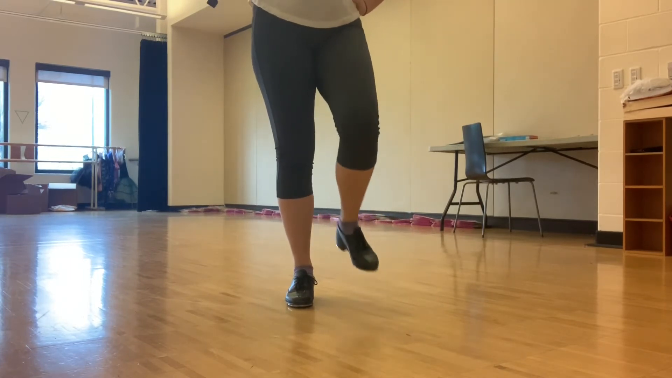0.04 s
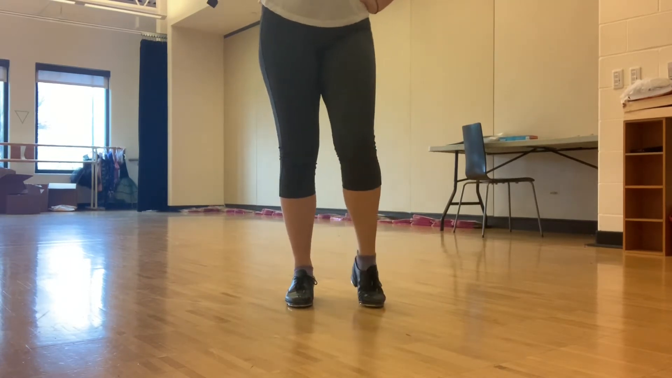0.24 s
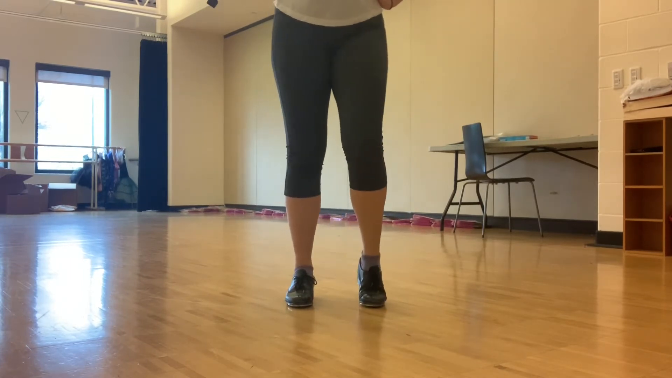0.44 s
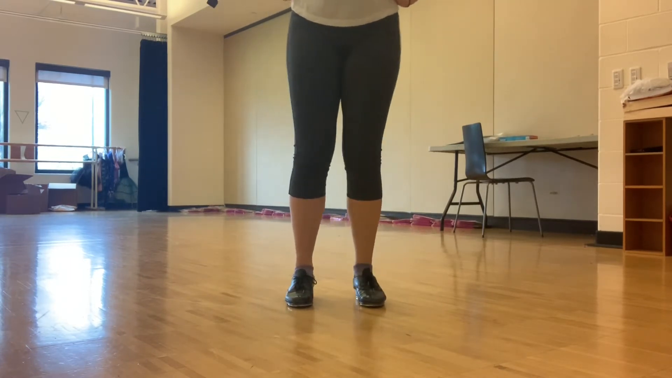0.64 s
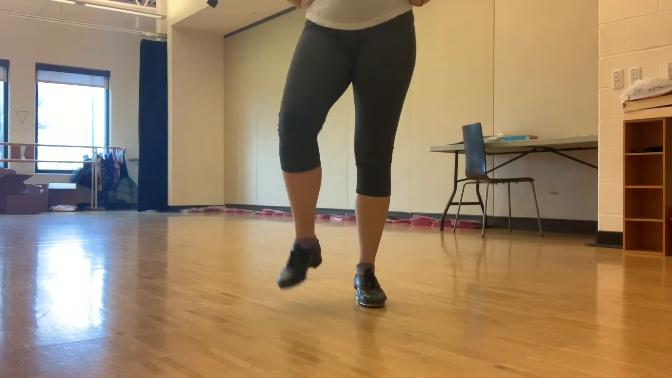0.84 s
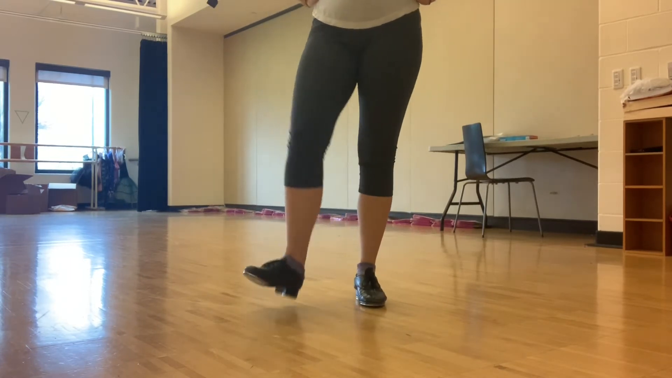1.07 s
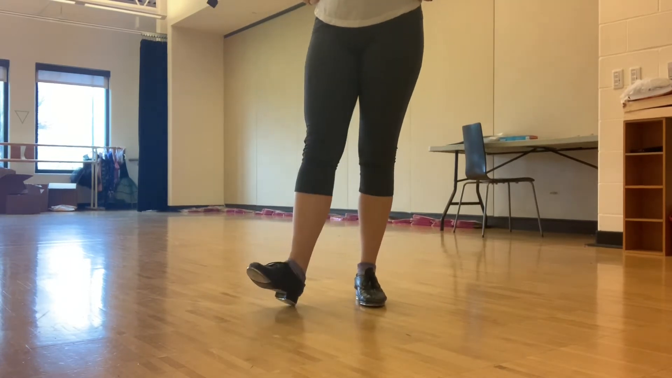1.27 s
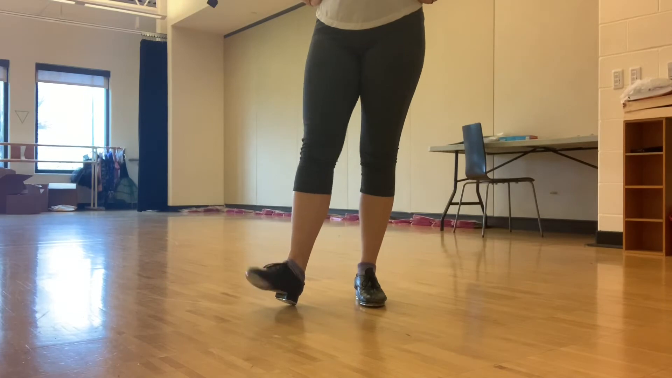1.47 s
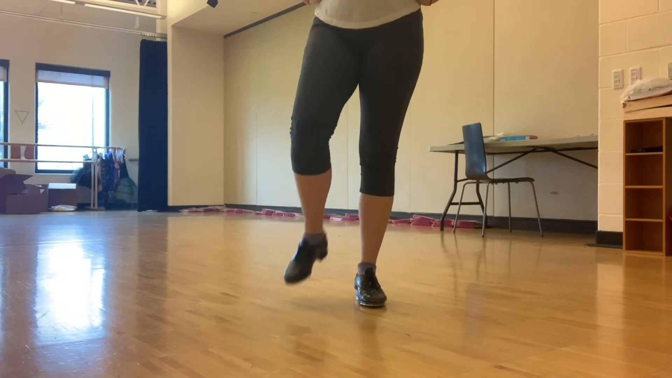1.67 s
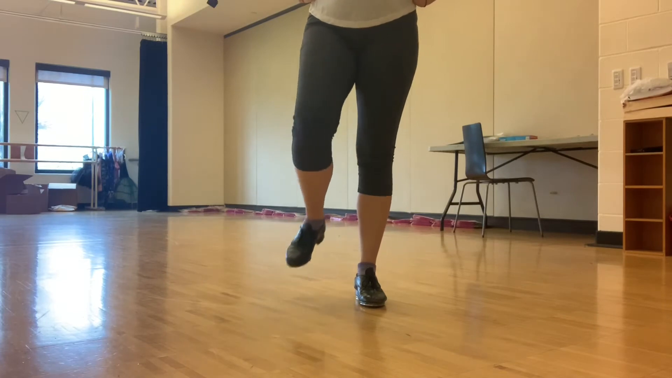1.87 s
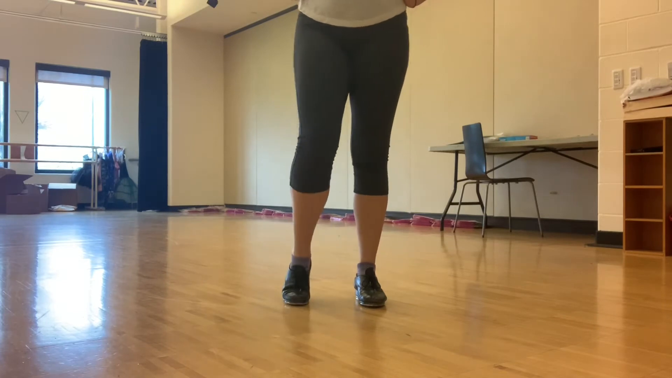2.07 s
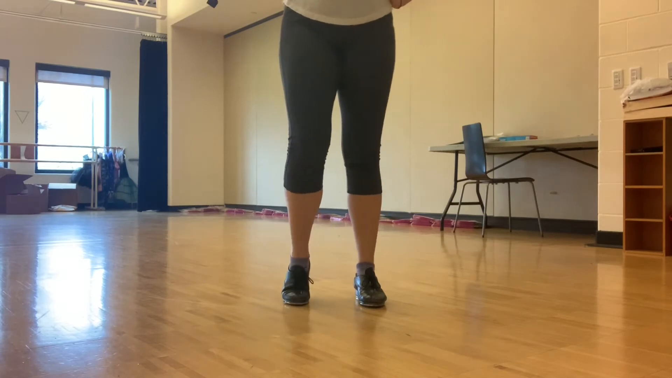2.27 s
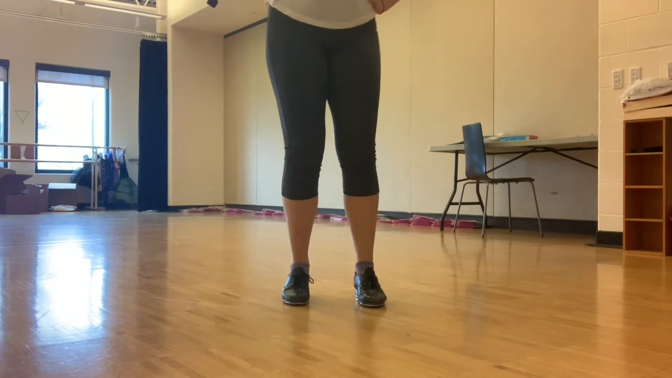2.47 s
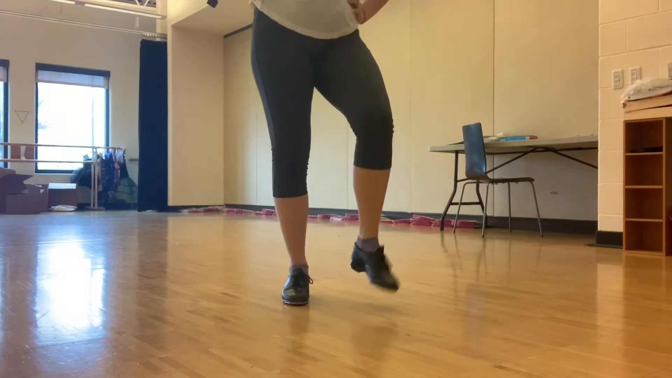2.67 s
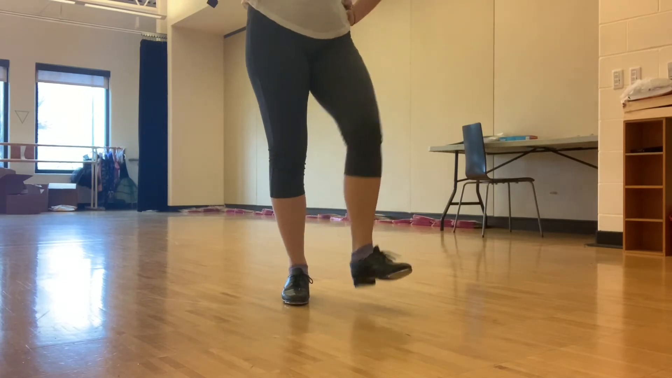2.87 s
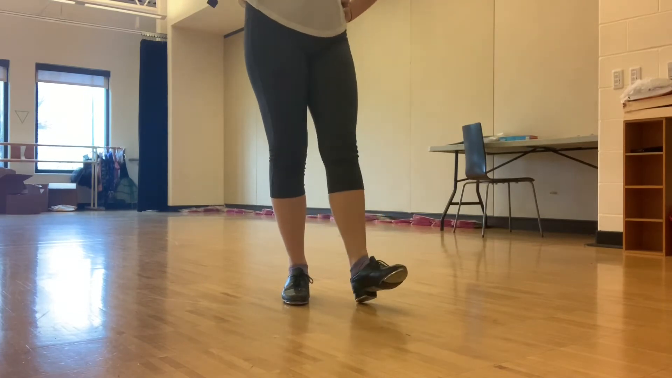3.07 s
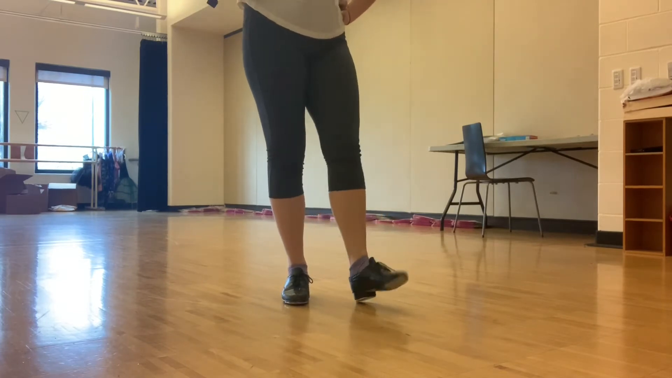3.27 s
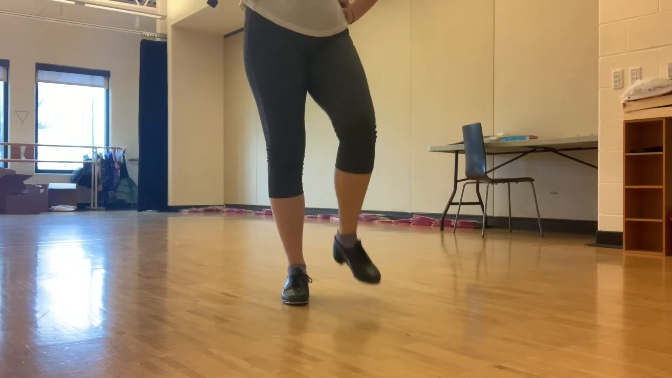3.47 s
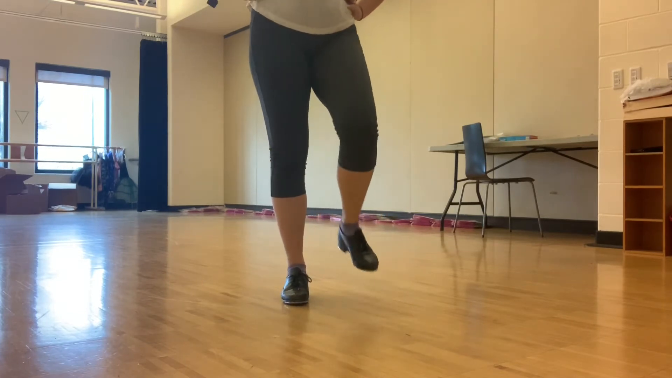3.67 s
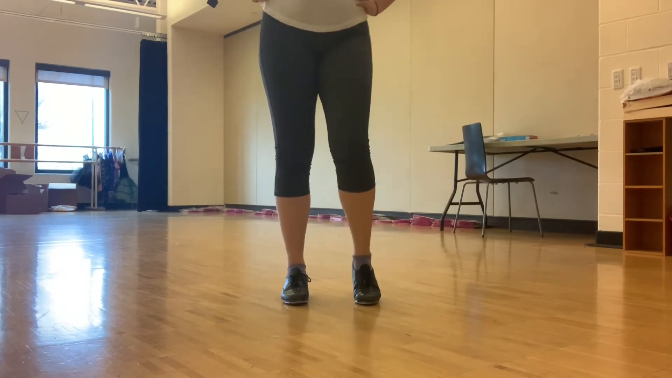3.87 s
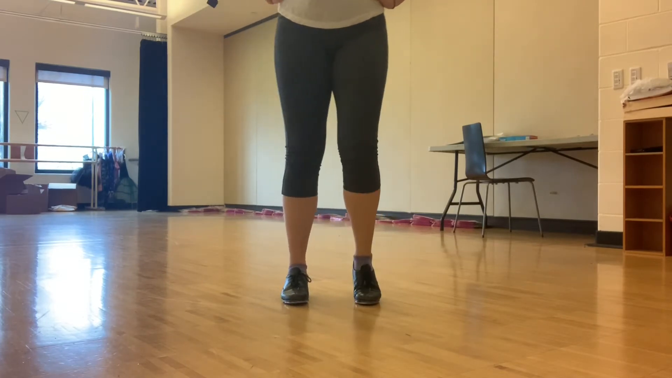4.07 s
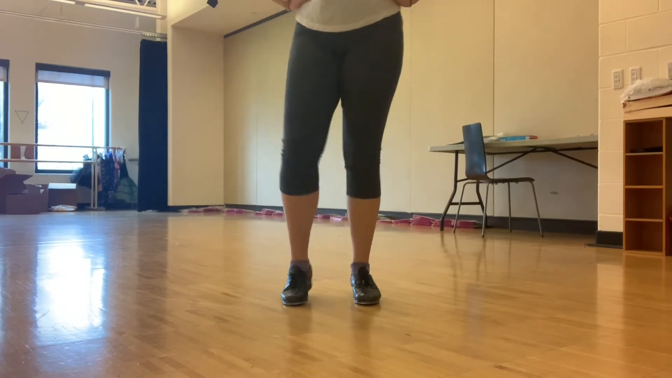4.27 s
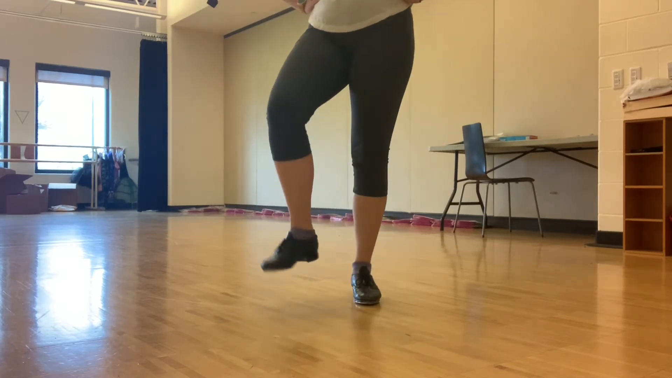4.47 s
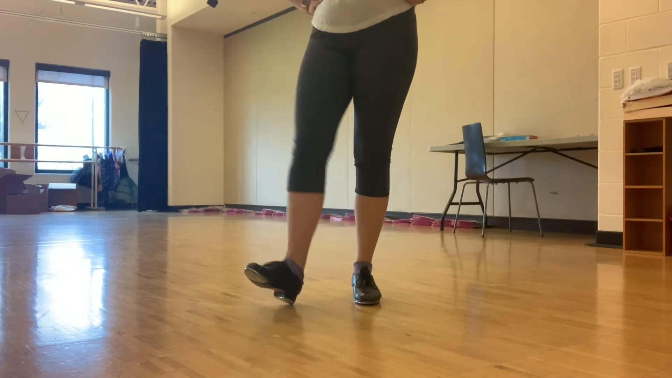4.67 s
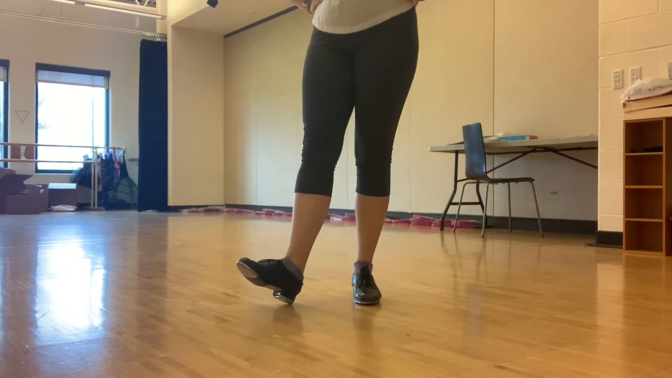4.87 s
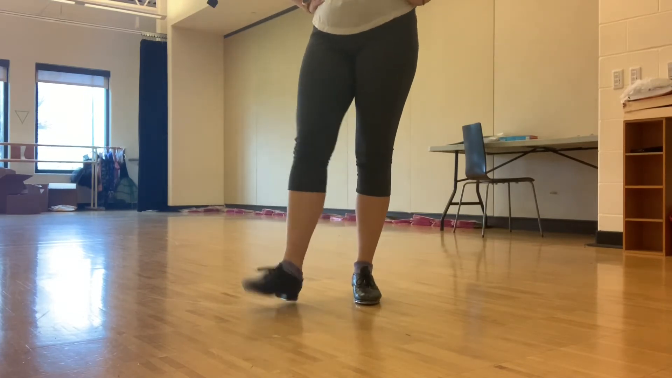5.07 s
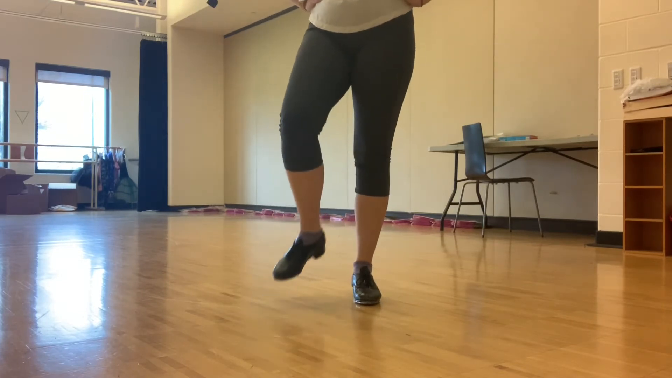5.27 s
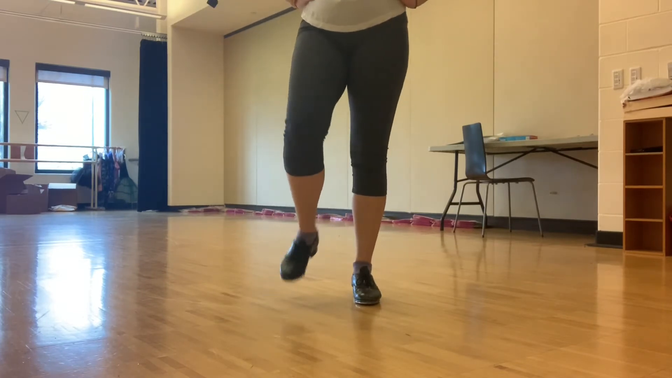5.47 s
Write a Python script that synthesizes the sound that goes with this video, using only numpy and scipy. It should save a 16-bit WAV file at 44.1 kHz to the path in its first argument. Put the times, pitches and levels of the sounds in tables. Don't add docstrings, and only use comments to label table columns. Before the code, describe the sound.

Tap shoes strike a wooden studio floor in slow, evenly spaced single taps, with ringing echoes and low ventilation rumble underneath.

```python
import sys
import numpy as np
from scipy import signal
from scipy.fft import rfft, irfft, next_fast_len
from scipy.io import wavfile

SR = 44100
rng = np.random.default_rng(int(sys.argv[2]) if len(sys.argv) > 2 else 0)


def decibels_to_gain(level_db):
    exponent = np.asarray(level_db, float) / 20
    return 10 ** exponent


def to_wav(s):
    ch = np.atleast_2d(s).T
    pcm = np.round(np.clip(ch, -1, 1) * 32767)
    wavfile.write(sys.argv[1], SR, pcm.astype(np.int16))


N = 243431


def read(points, hz):
    point_hz, value = np.transpose(points)
    return np.interp(np.log(hz + 1), np.log(point_hz + 1), value)


def colour(x, points):
    size = next_fast_len(x.shape[-1] + 4096)
    gain = decibels_to_gain(read(points, np.fft.rfftfreq(size, 1 / SR)))
    return irfft(rfft(x, size) * gain, size)[..., :x.shape[-1]]


def add(mix, start_s, sound):
    at = round(start_s * SR)
    sound = sound[..., max(-at, 0):]
    part = mix[..., max(at, 0):][..., :sound.shape[-1]]
    part += sound[..., :part.shape[-1]]


LEFT_SHOE = { "left step": [(1700, 1410, 18.5, 14.5), (2236, 630, 24, 22), (3830, 1240, 15, 16.5),
             (6380, 2200, 1, 6), (9800, 6400, 5.5, -4.5)], "left drop": [(1307, 340, 12.5, 14.5),
             (1660, 1260, 9.5, 5), (3670, 1740, -3, 3), (5370, 1650, 0, -1), (10400, 4000, -31, -19)],
             "left dig": [(1230, 720, 18.5, 15.5), (2790, 1200, 18.5, -14), (3350, 1450, 28, 18),
             (6380, 1400, 16, 3), (11000, 3200, 0, -9.5)], "left brush": [(1420, 3300, -13.5, 16),
             (1890, 660, 33, 21.5), (2680, 2900, 14.5, 19), (4650, 3900, 13, 8.5), (8300, 6800, 1, -7)], }
RIGHT_SHOE = { "right step": [(1390, 780, 21.5, 11), (2036, 480, 21, 26), (3450, 1360, 19.5, 17.5),
              (6580, 2000, 2, 11), (11600, 3300, 9.5, 3)], "right drop": [(1130, 500, 6.5, 3.5),
              (2420, 710, 10.5, 8), (3120, 550, -3, 0.5), (5000, 4000, -3.5, -2.5), (5300, 430, 6, -2.5),
              (7560, 290, -7, 6), (10100, 2110, 2, -6.5)], "right dig": [(1190, 600, 14.5, 10),
              (2640, 1200, 20.5, 9.5), (3160, 530, 20, 14.5), (3160, 250, -10, 11), (6450, 2300, 6, 2),
              (10740, 2500, 6, -10)], "right brush": [(1330, 510, 27.5, 6), (2040, 1080, 15, 19),
              (4075, 980, 20, 23), (5270, 4000, 12.5, 14), (10500, 2800, 18, 3.5)], }
FLAT = { "sole": [(514, 230, 1.5, -3), (1140, 550, -8.5, -15), (2290, 1100, -6, -13.5),
        (4000, 5600, -15, -18.5)], "slap": [(613, 96, 22.5, 18.5), (1340, 900, 28, 15.5),
        (2215, 860, 26, 24.5), (3610, 1760, 16.5, 21), (5630, 1400, 21, 19.5), (7300, 1500, 16, 12.5),
        (11200, 5200, 17, 3)], "heel tap": [(713, 300, 11, 9), (1600, 780, 13.5, 9), (3560, 1900, 1, 7),
        (6240, 1160, -11, 3), (10000, 4900, -10, -14)], }
# pitch_hz, width_hz, to_phone_db, to_room_db
FLOOR = [(157.2, 86, 0.5, 1), (321, 188, 0, -2.5), (432, 200, -2.5, -10), (627, 217, -10, -8)]


def blow(move, shoe_db, floor_db, deep_db, bright_db):
    def tipped(modes, db, slope_db, centre_hz):
        result = []
        for hz, width, *levels in modes:
            tilt_db = slope_db * np.log2(hz / centre_hz)
            result.append((hz, width, *(np.array(levels) + db + tilt_db)))
        return result

    boards = 1.099 if move in RIGHT_SHOE else 1
    floor = [(hz * boards, *rest) for hz, *rest in FLOOR]
    shoe = (LEFT_SHOE | RIGHT_SHOE | FLAT)[move]
    return tipped(floor, floor_db, -deep_db, 300) + tipped(shoe, shoe_db, bright_db, 2500)


# start_s, move, shoe_db, floor_db, deep_db_per_octave (panel over boards), bright_db_per_octave
BLOWS = [(-.25, "slap", -5, 16, 3, -3.5), (0.2027, "left step", 0.5, 21, -0.5, 0.7),
         (0.659, "left drop", -0.5, 19, 3, -3), (1.1512, "right dig", -0.3, 24, -1.5, -0.1),
         (1.6114, "right brush", -3, 15.5, 1, 1.2), (2.054, "right step", 0.74, 22.5, 2.1, 0.6),
         (2.4349, "sole", 5.5, 2, 7, 4.5), (2.5341, "right drop", -0.3, 12.5, 0.5, 0.1),
         (2.9888, "left dig", -0.3, 27, -5.5, 0.3), (3.4, "left brush", 0.6, 26, -0.7, 1.6),
         (3.8502, "left step", -0.56, 19.5, -1, 1.9), (4.286, "heel tap", 0, 20, 4, 0),
         (4.7294, "right dig", 0.5, 24, -1.1, 0.3), (5.0751, "sole", -5.3, -1, 8, -4),
         (5.1353, "slap", 1.2, 23.5, 7, 0.44), (2.497, "sole", -9.5, 2, 4, -2.5)]
# start_s, pitch_hz, to_phone_db, to_room_db
TOUCHES = [
    (.635, 12500, -25, -50),
    (0.653, 9700, -15, -14),
    (2.4215, 9000, -39, -36),
    (2.4346, 11000, 5.5, -8),
    (2.483, 12400, -22, -26),
    (4.182, 10900, -6.5, -20),
    (4.183, 4000, -19, -18),
    (4.297, 9000, -32, -33),
]


def footwork():
    blows = [(start, blow(*how)) for start, *how in BLOWS]
    width_over_pitch = 0.48
    touches = [(start, [(hz, width_over_pitch * hz, to_phone_db, to_room_db)])
               for start, hz, to_phone_db, to_room_db in TOUCHES]
    return blows + touches


def ring(hz, width, db):
    t = np.arange(SR // 10) / SR
    rate = 1.25 * np.pi * max(width, 30)
    swell = rate ** 3 / SR * t ** 2 * np.exp(-rate * t)
    late_bass = 0.0065 * np.clip((450 - hz) / 200, 0, 1)
    lead = min(2.2 / rate, 0.0022) - late_bass
    return lead, decibels_to_gain(db) * swell * np.cos(2 * np.pi * hz * (t - lead) + 2 * np.pi * rng.random())


def direct_taps(contacts):
    direct = np.zeros((2, N))
    longest_bounce_s, bounce_db = 0.00169, -6
    narrower, direct_db = 0.91, -2.5
    for start, modes in contacts:
        for hz, width, db, _ in modes:
            lead, sound = ring(hz, narrower * width, direct_db + db)
            add(direct, start - lead, sound)
            bounce_s = longest_bounce_s * rng.uniform(0.3, 1)
            add(direct, start - lead + bounce_s, decibels_to_gain(bounce_db) * sound)
    return colour(direct, [(150, -1.5), (280, -6.0), (600, 1), (820, 1.5), (930, -12.5), (1050, 2),
                           (1500, -4.0), (2500, -4.0)])


# start_s, length_s, level_db
SCUFFS = [
    (.48, 0.15, -69.5),
    (2.27, .16, -68),
    (2.433, 0.1, -76),
    (4.18, 0.12, -83.5),
]


def scuffs():
    out = np.zeros((2, N))
    for start, length, db in SCUFFS:
        size = round(length * SR)
        grit = rng.standard_normal((2, size)) * signal.windows.hann(size)
        add(out, start, decibels_to_gain(db) * np.diff(grit, 2))
    return out


# delay_s, left_db, right_db
ECHOES = [(.0019, -6, -9), (.0034, -10, -12), (.0052, -12, -16), (.0074, -12, -16), (.0118, -15, -13)]


def first_echoes(direct):
    out = np.zeros((2, N))
    dull = colour(direct, [(2500, -1), (5000, -4.0), (9000, 1.5), (16000, -14.5)])
    sign = np.ones((2, 1))
    for delay, left_db, right_db in ECHOES:
        sign = sign * [[-1], [1]]
        add(out, delay, dull * sign * decibels_to_gain([[left_db], [right_db]]))
    return out


# pitch_hz, fall_by_60_db_s
STUDIO = [(120, 0.66), (300, 0.51), (700, 0.6), (1200, 0.53), (2200, 0.8), (4000, 0.92), (7000, 0.87),
          (12000, 0.48)]
# start_s, pitch_hz, width_hz, depth
DIPS = [
    (1.61, 2940, 510, 0.96),
    (2.055, 2780, 130, 1),
    (.2, 3500, 1200, 0.37),
    (2.5, 3300, 240, 0.54),
    (2.534, 1100, 240, 0.7),
]


def tail(start_s, modes):
    echoes = rng.standard_normal((2, SR)) * (rng.random((2, SR)) < 0.4)
    hz, t, z = signal.stft(echoes, SR, nperseg=256)
    t60 = read(STUDIO, hz)[:, None]
    late = decibels_to_gain(-120 * t / t60) / t60
    near_t60, near_db = 0.06, -3
    near = decibels_to_gain(2 * near_db - 120 * t / near_t60) / near_t60
    echoes = signal.istft(z * np.sqrt(late + near), SR, nperseg=256)[1][:, :SR]

    hz = np.geomspace(20, SR / 2, 400)
    power = 0
    for mode_hz, width, _, db in modes:
        power = power + decibels_to_gain(2 * db) / (1 + (2 * (hz - mode_hz) / width) ** 2) ** 1.93
    for at, dip_hz, width, depth in DIPS:
        if abs(at - start_s) < 0.04:
            power = power * (1 - min(depth, 0.99) * np.exp(-((hz - dip_hz) / width) ** 2))
    echoes = echoes / np.linalg.norm(echoes[0])
    echoes = colour(echoes, np.transpose([hz, 10 * np.log10(power)]))

    t = np.arange(SR) / SR
    thicken = (t - 0.001) / 0.0089
    fade = 10 * (1 - t)
    return echoes * np.clip(np.minimum(thicken, fade), 0, 1)


# pitch_hz, left_over_right_db
LEFT = [(150, 8.5), (300, 4.5), (600, -2), (1500, 0.5), (3000, 0.5), (6000, 3.5), (12000, -9.5)]


def taps():
    contacts = footwork()
    direct = direct_taps(contacts)
    out = scuffs() + first_echoes(direct)
    for start, modes in contacts:
        add(out, start, tail(start, modes))
    add(out[0], 2 / SR, direct[0])
    add(out[1], 0, direct[1])
    half_lean = np.array(LEFT) * [1, 0.5]
    return np.array([colour(out[0], half_lean), colour(out[1], half_lean * [1, -1])])


# pitch_hz, level_db_per_hz
DUCT = [(20, 3), (40, 3.5), (59, 13.5), (80, 4.5), (125, -2.5), (260, -21), (350, -16)]
# pitch_hz, level_db_per_hz
HISS = [(920, -29.5), (3400, -31.5), (4700, -38), (7500, -36.5), (10000, -45), (14800, -56), (16000, -81)]
# time_s, level_db
DRIFT = [(0.0, -43), (0.84, -43.5), (1.33, -38.5), (2.11, -43), (3.02, -40.5), (3.89, -44.5), (4.61, -42.5),
         (4.79, -45), (5.25, -38.5), (5.5, -44.5)]
# pitch_hz, likeness (0-1)
AIR_SAME = [(60, 1), (130, 0.83), (290, 0.091), (1000, 0.017), (15000, 0.028)]
# pitch_hz, left_over_right_db
AIR_LEFT = [(40, 1.5), (110, 9), (200, 10.5), (400, 1), (1000, .5)]


def ventilation():
    frames, hz = N // 1024 + 6, np.fft.rfftfreq(4096, 1 / SR)
    a, b, c, d = rng.standard_normal((frames, len(hz), 4)).T
    left, other = a + 1j * b, c + 1j * d
    same = np.clip(read(AIR_SAME, hz), -1, 1)[:, None]
    z = np.array([left, same * left + np.sqrt(1 - same ** 2) * other])

    time_s, drift_db = np.transpose(DRIFT)
    frame_s = (np.arange(frames) - 4) * 1024 / SR
    swell_db = np.interp(frame_s, time_s, drift_db - np.mean(drift_db))
    bass_only = np.clip((140 - hz) / 50, 0, 1)[:, None]
    z = z * decibels_to_gain(bass_only * swell_db)

    half_lean = read(AIR_LEFT, hz)[:, None] / 2
    z = z * decibels_to_gain(read(DUCT + HISS, hz)[:, None] + np.array([half_lean, -half_lean]))
    air = signal.istft(z, nperseg=4096, noverlap=3072)[1][:, 4096:N + 4096]
    level_db = -41
    return decibels_to_gain(level_db) * air / np.sqrt(np.mean(air ** 2) + 1e-20)


def scene():
    return taps() + ventilation()


def band_limit(x):
    return signal.sosfilt(signal.butter(12, 16670, fs=SR, output="sos"), x)


# pitch_hz, level_db
SUM_DB = [(5000, 3), (7000, 2), (8300, -4), (9300, -16), (10300, -0.5), (12000, 0.5), (14000, 6.5),
          (16000, -12)]
# pitch_hz, level_db
DIFFERENCE_DB = [(100, -1), (400, 3.5), (5000, 2.5), (8500, 5), (11000, 3.5), (12800, -18.5), (16000, -27)]


def record(dry):
    total = colour(dry[0] + dry[1], SUM_DB) / 2
    difference = colour(dry[0] - dry[1], DIFFERENCE_DB) / 2
    x = np.array([total + difference, total - difference])
    x = colour(x, [(20, -26.5), (32, -15), (50, 0)])

    blur_s, blur_db = 0.013, -16.5
    size = round(blur_s * SR)
    blur = rng.standard_normal((2, size)) * np.geomspace(0.12, 1.5, size)
    high = colour(x, [(400, -51), (1000, 10.5), (7000, 1.5), (9500, -41.5)])
    ahead = signal.oaconvolve(high, blur / np.sqrt(size), axes=1)[:, size:]
    x = x + decibels_to_gain(blur_db) * np.pad(ahead, ((0, 0), (0, 1)))

    limit = 0.74
    x = limit * np.tanh(x / limit)
    return band_limit(colour(x, [(16400, 0), (16800, -60)]))


dry = scene()
out = record(dry)
to_wav(out)
```